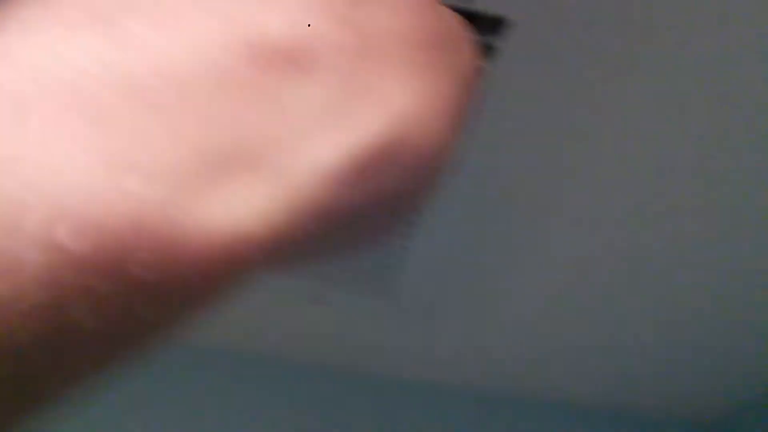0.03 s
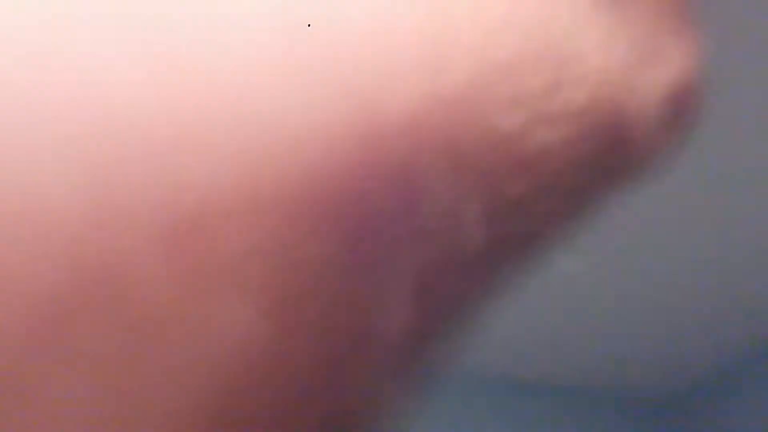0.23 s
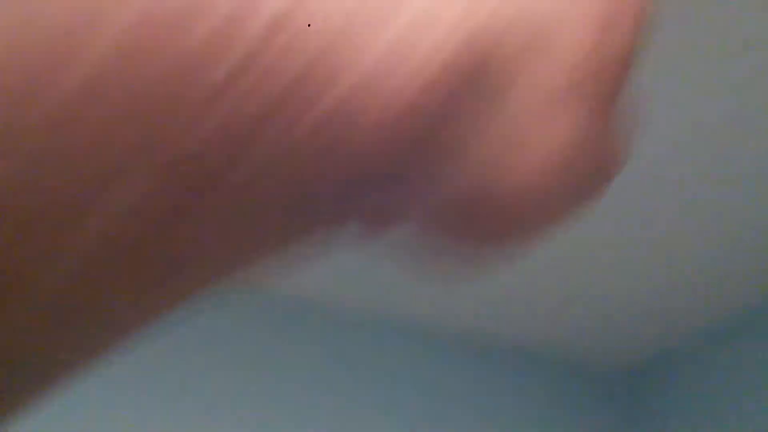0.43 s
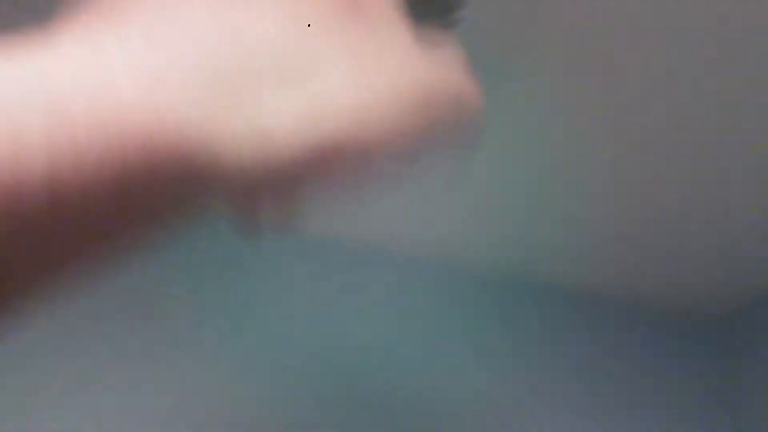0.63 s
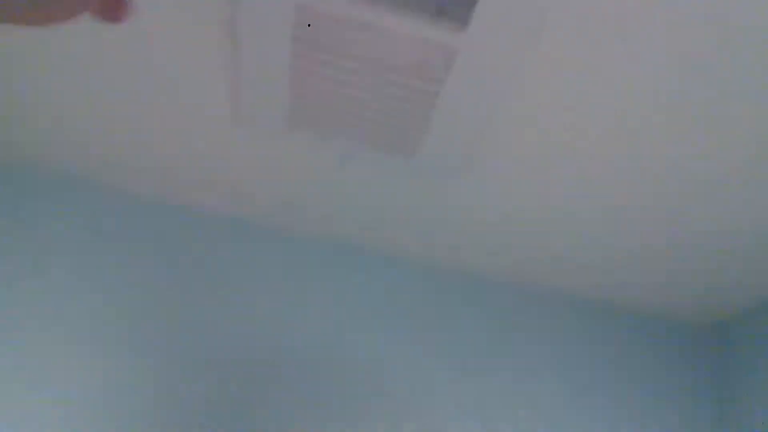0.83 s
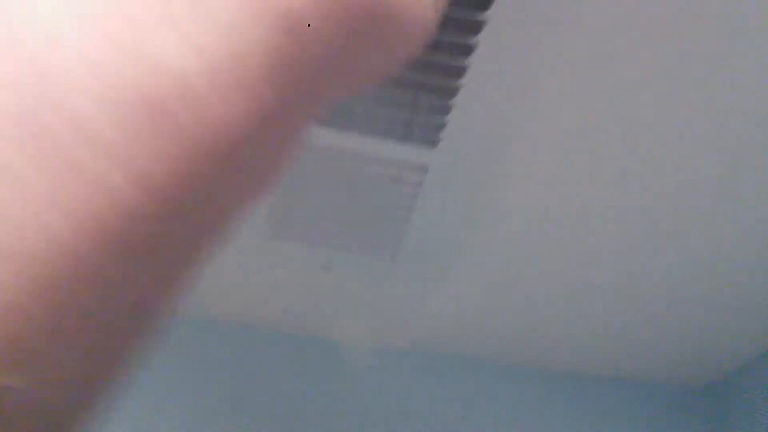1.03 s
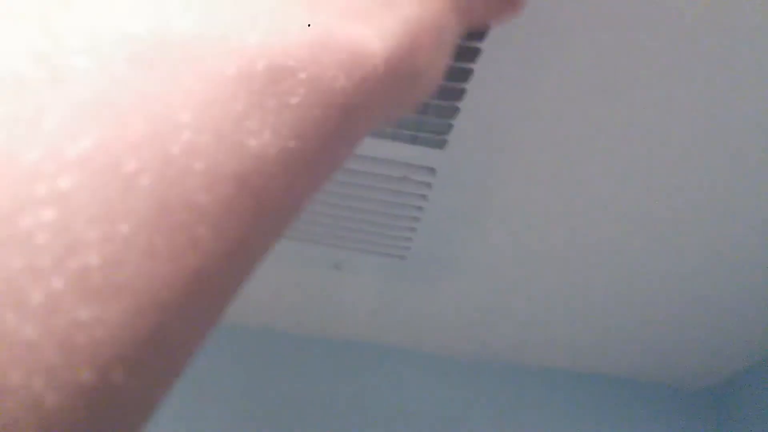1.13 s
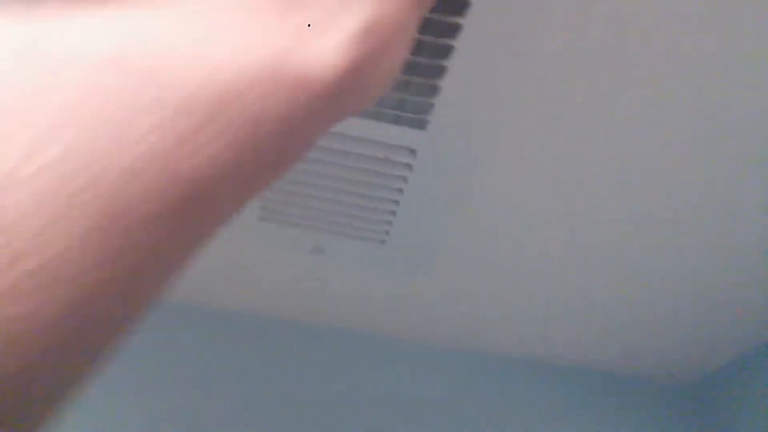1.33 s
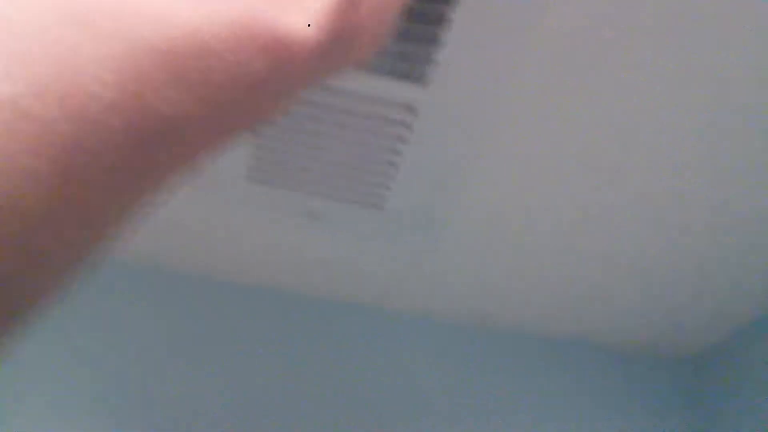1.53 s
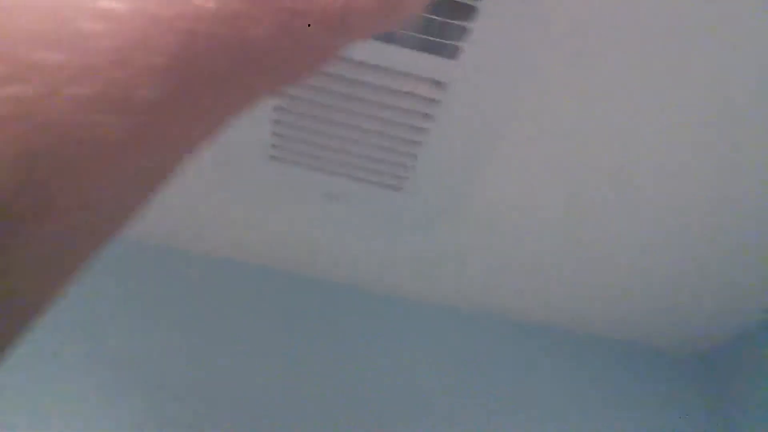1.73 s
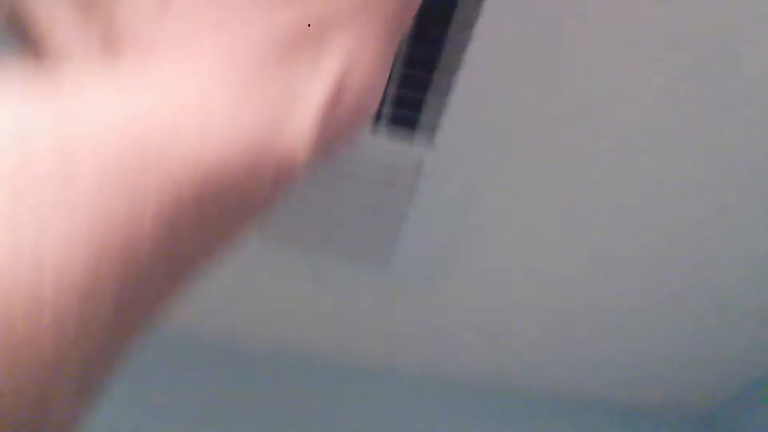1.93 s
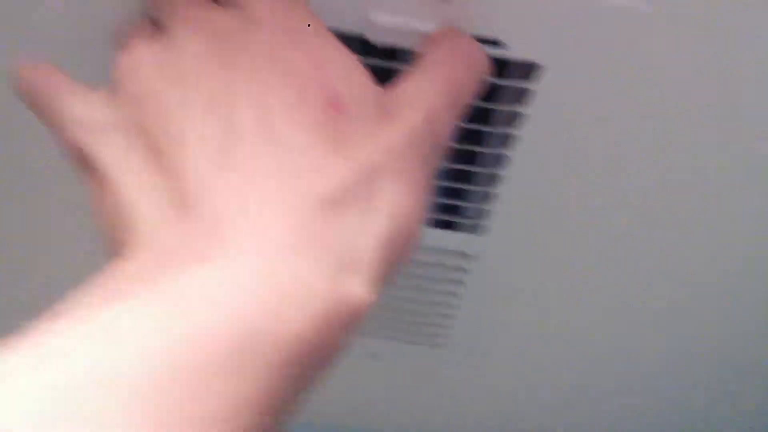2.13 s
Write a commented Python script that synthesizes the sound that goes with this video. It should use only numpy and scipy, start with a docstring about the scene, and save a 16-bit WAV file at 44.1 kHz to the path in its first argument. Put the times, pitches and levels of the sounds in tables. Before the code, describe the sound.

Banging on a stuck metal vent cover in a small room: one loud rattling crash rings away, then faint taps, a creak and growing clatter lead to a sharp metallic snap. The close microphone distorts on the two loudest hits.

```python
"""A stuck metal ceiling vent, slammed with a fist, then gripped and forced until its louvres snap over.
Each contact chatters through the thin sheet into a small room; frame and louvres ring on.
Single tones sound around the blows, the catch clacks, the cover creaks by stick-slip, over faint room noise.
The two big bangs overload the close microphone."""
import sys
import numpy as np
from scipy import signal
from scipy.io import wavfile

SR = 44100
rng = np.random.default_rng(int(sys.argv[2]) if len(sys.argv) > 2 else 0)


def to_wav(s):
    """Save 16-bit WAV."""
    ch = np.atleast_2d(s).T  # columns
    pcm = np.round(np.clip(ch, -1, 1) * 32767)  # PCM
    wavfile.write(sys.argv[1], SR, pcm.astype(np.int16))


N = 97020

# Centres of the seven bands of a blow's spectrum, in Hz.
BAND_CENTRES_HZ = [50, 140, 400, 1000, 2600, 5000, 11000]


def vent():
    """Blows crash through the sheet and ring frame and louvres as hard as they drive each pitch."""
    # Each row: start, rise and chatter in seconds, seven band levels in dB, frame and louvre share in dB.
    blows = [(0.0, 0.00033, 0.0065, -40, -71, -48, -66.5, -51, -47, -61, -8, -13),
             (0.025, 0.0011, 0.00081, -42, -45.5, -62, -65, -45, -48.5, -57.5, -11.5, -1.5),
             (0.057, 0.0012, 0.0058, -35, -44.5, -46.5, -70, -54, -67, -88.5, 3, -35),
             (0.08, 0.0021, 0.0046, -36, -69, -48.5, -55.5, -39.5, -44, -54, -7.5, -11.5),
             (0.2, 0.0062, 0.0028, -34, -32.5, -20.5, -24, -27.5, -33, -23.5, -15, -19),
             (0.2098, 0.0013, 0.0044, -30.5, -33.5, -30, -12.5, -10.5, -14, -8, -21, -19),
             (0.211, .001, 0.1, -18, -25.5, -14.5, -10.5, -6, -5, -1.5, 2, -20),
             (0.295, 0.013, 0.04, -30, -29.5, -15.5, -19, -9.5, -12, -11.5, -9, -49),
             (0.333, .003, .012, -30, -37.5, -23.5, -20, -24, -22.5, -25.5, -20, -34),
             (0.897, 0.0017, 0.0059, -69.5, -44.5, -50, -57, -89, -93.5, -88.5, -17, -26.5),
             (0.993, 0.026, 0.042, -85, -62, -55, -52, -57.5, -71, -82.5, -26, -6),
             (1.231, 0.00083, 0.0029, -90.5, -71.5, -72, -49.5, -65, -74, -90, -19, -22),
             (1.403, 0.0019, 0.006, -80, -45.5, -42, -47, -67.5, -82, -86, 8, -30),
             (1.420, 0.0011, 0.0037, -85, -43, -31.5, -32.5, -34.5, -35.5, -43, -20, -14),
             (1.438, 0.0037, 0.056, -71, -53, -32.5, -35.5, -38, -45, -91, -16, -15),
             (1.543, 0.0027, 0.011, -69, -50, -44.5, -45.5, -44, -52, -85, -10, -8),
             (1.608, .002, 0.025, -64.5, -54, -34.5, -40, -35, -39, -64, -28.5, -14),
             (1.628, 0.0025, 0.026, -59, -36, -33, -28, -29.5, -36, -64.5, -31, -11.5),
             (1.789, 0.0016, 0.0023, -58, -40, -32.5, -34, -39, -40.5, -75, -14, -2),
             (1.8289, 0.005, 0.038, -50, -32, -30, -23.5, -10.5, -13.5, -12, -14.5, -2),
             (1.996, 0.00088, 0.015, -76, -64, -36.5, -54, -36.5, -32, -46, -21, -10.5)]
    # Each row: frequency in Hz, level in dB re the blow at that pitch plus its share, T60 in seconds.
    frame_modes = [(200, -17, 1.4), (412.3, -16.5, 1.9), (441.1, -16.5, 1.8), (445.4, -18, 3.4),
                   (610, -12, 0.84), (946, -10, 0.69), (1188, -9.5, 0.87), (1376, -15, 0.71),
                   (2035, -10, .42), (2270, 0, .38), (2299, 5.5, 0.45), (2574, -5, .36), (2604, -8, 0.37),
                   (2732, -8, 0.37), (3180, -10.5, .47), (4803, -9.5, 0.19), (5100, -7, .48),
                   (5504, -6.5, .45), (8680, -10, .27), (9671, -7.5, .32), (9710, -12.5, 0.27)]
    louvre_modes = [(587, 1.5, 0.68), (1040, 4, 0.46), (1823, -3.5, 0.69), (1885, 6.5, 0.44),
                    (2150, -6, 0.6), (2302, -3.5, 0.47), (2494, -4, .3), (2650, -9, 0.23), (2775, -5, 0.29),
                    (2930, -5, 0.31), (3430, -3, 0.42), (3758, -4, 0.43), (4305, -9, .6),
                    (4480, -2.5, 0.27), (5250, -7.5, 0.35), (5640, -4.5, .52), (6390, -7, 0.2),
                    (6740, -9.5, 0.43), (8000, -10, 0.2)]
    out = np.zeros(N)
    for start_s, rise_s, chatter_s, *band_db, frame_db, louvre_db in blows:
        add(out, start_s, sheet_crash(rise_s, chatter_s, band_db))
        drive = list(zip(BAND_CENTRES_HZ, band_db))
        for modes, share_db in ((frame_modes, frame_db), (louvre_modes, louvre_db)):
            driven = [(hz, db + share_db + read(drive, hz), t60_s) for hz, db, t60_s in modes]
            add(out, start_s, ring(driven, rise_s + chatter_s / 2))
    return out


def sheet_crash(rise_s, chatter_s, band_db, spots=4, ripple_db=3, ripple_step_hz=90.35):
    """Clicks land on several spots of the sheet, each with its own dense response."""
    band_widths_hz = [65, 130, 400, 900, 2000, 3500, 9000]
    # Sheet metal colour. Each row: frequency in Hz, gain in dB.
    sheet_eq = [(25, -1.5), (75, 0.5), (105, -6.5), (155, 1), (260, -7.5), (600, 0.5), (800, -0.5),
                (1400, -3), (1680, -6), (2000, 0.5), (2280, 3), (2850, 0), (3300, -2), (3950, -3.5),
                (4400, 0.5), (5550, -.5), (7200, -3), (10000, 0.5), (16000, -4)]
    clicks = chatter(rise_s, chatter_s)
    spot = rng.integers(0, spots, len(clicks))
    sound = sum(signal.fftconvolve(clicks * (spot == k), contact_response()) for k in range(spots))
    density_db = np.array(band_db) - 10 * np.log10(np.array(band_widths_hz) / (SR / 2))
    spectrum = list(zip(BAND_CENTRES_HZ, density_db))
    ripple = ripple_db * np.clip(rng.standard_normal(512), -2, 2)  # each blow favours its own modes

    def gain_db(hz):
        clusters_db = np.interp(hz / ripple_step_hz, np.arange(len(ripple)), ripple) * hz / (hz + 500)
        return read(spectrum, hz) + read(sheet_eq, hz) + clusters_db

    return colour(sound, gain_db) * np.sqrt(SR / 20)


def chatter(rise_s, length_s, clicks_per_s=2200):
    """Loose metal rattles after a contact: a swelling, fading spray of clicks, total energy 1."""
    t = np.arange(SR // 4) / SR
    force = np.minimum(t / rise_s, 1) * np.exp(-(t / (rise_s + length_s)) ** 4)
    clicks = force * rng.choice([-1., 1.], len(t)) * (rng.random(len(t)) < clicks_per_s / SR)
    clicks[0] = 0.48  # first contact
    return clicks / np.linalg.norm(clicks)


def contact_response(early_db=4.5, early_s=0.01):
    """Sheet and room after one contact: strong early echoes, then a tail dying band by band."""
    # Each row: frequency in Hz, T60 in seconds.
    decay_times = [(60, .33), (160, .42), (500, 0.51), (1200, 0.55), (2500, 0.48), (6200, 0.44),
                   (7600, 0.33), (14000, 0.27)]
    hz, t, spectra = signal.stft(rng.choice([-1., 1.], SR), SR, nperseg=256)
    fade = amp(-60 * t / read(decay_times, hz)[:, None])
    tail = signal.istft(spectra * fade, SR, nperseg=256)[1][:SR]
    tail *= 1 + amp(early_db) * np.exp(-np.arange(SR) / SR / early_s)
    return tail / np.linalg.norm(tail)


def ring(modes, rise_s):
    """Modes build up and decay; close pairs beat, and room echoes make them waver."""
    t = np.arange(3 * SR // 2) / SR
    out = np.zeros(len(t))
    for hz, db, t60_s in modes:
        age_s = t[:int(1.3 * t60_s * SR)]
        echoes = rng.standard_normal(256) + 1j * rng.standard_normal(256)
        depth = 0.8 * hz / (hz + 900)  # low modes waver less
        wavers_per_s = 22 + 0.011 * hz
        waver = 1 + depth * np.interp(age_s * wavers_per_s, np.arange(len(echoes)), echoes)
        partial = np.exp(-np.log(1000) * age_s / t60_s + 2j * np.pi * hz * age_s)
        add(out, 0, amp(db) * (waver * partial).imag)
    return out * np.minimum(t / rise_s, 1)


def single_tones():
    """Single tones around the blows: lingering metal rings, short squeals, pops and a low thud."""
    # Each row: start in seconds, frequency in Hz, level in dB, rise and T60 in seconds.
    tones = [(0.0, 946, -50, 0.081, 3.1), (0.09, 408, -45, 0.046, 1.5), (0.211, 1390, 1.5, 0.0018, 0.019),
             (0.212, 9760, -10.5, .003, .14), (0.335, 597, -3.5, 0.0081, 0.081),
             (0.365, 2290, -14, .025, 0.39), (0.9, 143, -37.5, .015, 0.225),
             (0.96, 262, -48.5, 0.077, 0.55), (1.421, 404.3, -37, 0.0087, 1.4),
             (1.645, 587, -22.5, 0.021, 0.44), (1.995, 2197, -22.5, 0.0068, 0.33)]
    out = np.zeros(N)
    for start_s, hz, db, rise_s, t60_s in tones:
        add(out, start_s, ring([(hz, db, t60_s)], rise_s))
    return out


def catch(pivot_hz=2790):
    """The stiff catch holding the louvres slips in short, hard clacks."""
    # Each row: frequency in Hz, level in dB, T60 in seconds.
    catch_modes = [(2688, -1, 0.16), (2850, -4, 0.18), (4640, -5, 0.042), (5600, -7, 0.091),
                   (6250, -4, 0.036)]
    # Each row: start in seconds, level in dB, tilt in dB per octave.
    clacks = [(1.4199, -29.5, 5), (1.63, -24, -3.5), (1.789, -26, -4), (1.831, -10, -9.5), (1.844, -15, 8)]
    out = np.zeros(N)
    for start_s, clack_db, tilt in clacks:
        tilted = [(hz, clack_db + db + tilt * np.log2(hz / pivot_hz), t60_s)
                  for hz, db, t60_s in catch_modes]
        add(out, start_s, ring(tilted, rise_s=0.0014))
    return out


def creak(start_s=1.144, length_s=0.078, slips_per_s=120, jitter=0.0962, level_db=-36.5, room_db=10):
    """Stick-slip under the hand: the forced cover gives a short, uneven run of ticks."""
    # Each row: frequency in Hz, gain in dB.
    creak_eq = [(50, -38), (170, -17), (450, -9.5), (750, 0), (1000, 2), (1400, -5), (1900, -18),
                (2700, -10.5), (4000, -18), (4700, -38), (6300, -34.5), (8000, -58), (16000, -53.5)]
    slips, out = np.zeros(SR // 2), np.zeros(N)
    damping = np.exp(-np.arange(SR) / SR / 0.033)  # the grip shortens the tail
    times_s = np.cumsum(1 + jitter * rng.standard_normal(32)) / slips_per_s
    for slip_s in times_s - times_s[0]:
        if slip_s < length_s:
            tick = amp(room_db) * contact_response() * damping
            tick[0] += 1  # direct sound
            progress = (slip_s + 1 / slips_per_s) / (length_s + 2 / slips_per_s)
            add(slips, slip_s, tick * np.sin(np.pi * np.sqrt(progress)))
    sound = colour(slips, lambda hz: read(creak_eq, hz))
    add(out, start_s, amp(level_db) * sound / np.linalg.norm(sound) * np.sqrt(length_s * SR))
    return out


def room_noise(rms_db=-58):
    """Faint steady air in the room."""
    # Each row: frequency in Hz, relative density in dB.
    air_spectrum = [(25, -15), (70, -6.5), (150, 4.5), (300, -1.5), (600, -2), (1100, -11.5), (2500, -22),
                    (6000, -29), (15000, -33.5)]
    air = colour(rng.standard_normal(N), lambda hz: read(air_spectrum, hz))
    return amp(rms_db) * air / np.sqrt(np.mean(air ** 2))


def amp(db):
    """Decibels to gain."""
    return 10 ** (np.asarray(db) / 20)


def read(points, hz):
    """Interpolates (Hz, value) rows on a log-frequency axis."""
    points_hz, values = np.transpose(points)
    return np.interp(np.log(hz + 1), np.log(points_hz + 1), values)


def add(mix, start_s, sound):
    """Mixes a sound in, in place."""
    part = mix[max(round(start_s * SR), 0):][:len(sound)]
    part += sound[:len(part)]


def colour(x, gain_db, size=4096):
    """Causal filter shaped by gain_db(hz)."""
    log_gain = np.log(amp(gain_db(abs(np.fft.fftfreq(size, 1 / SR)))))
    taps = np.fft.ifft(np.exp(np.conj(signal.hilbert(log_gain)))).real
    return signal.fftconvolve(x, taps[:size // 2])[:len(x)]


def scene():
    """One microphone, the same in both channels."""
    return np.tile(vent() + single_tones() + catch() + creak() + room_noise(), (2, 1))


def record(dry):
    """The input overloads; then deep bass and top are cut."""
    ceiling, knee = 0.64, 4.24
    low_cut_hz, high_cut_hz = 110, 15900
    clipped = dry / (6 + abs(dry / ceiling) ** knee) ** (1 / knee)
    thinned = signal.lfilter(*signal.butter(2, low_cut_hz, "high", fs=SR), clipped)
    lowpass_taps = signal.firwin(255, high_cut_hz, window=("kaiser", 7), fs=SR)
    return signal.oaconvolve(thinned, lowpass_taps[None], "same")


dry = scene()
out = record(dry)
to_wav(out)
```